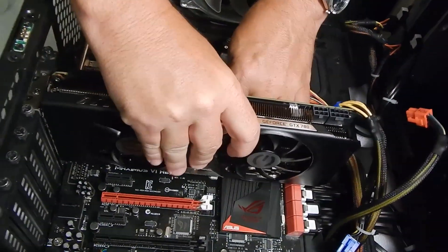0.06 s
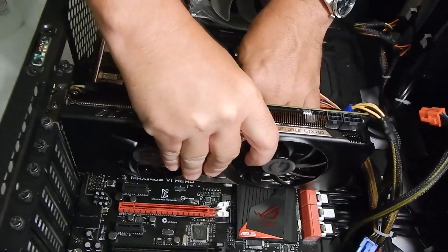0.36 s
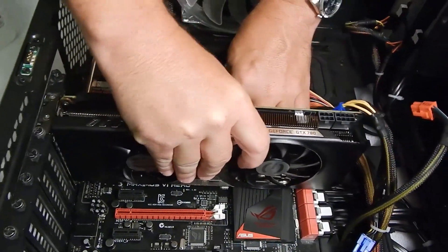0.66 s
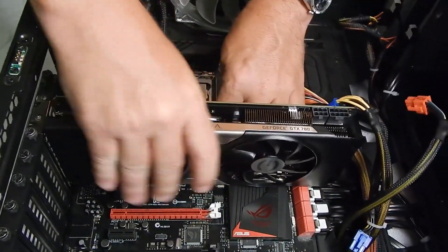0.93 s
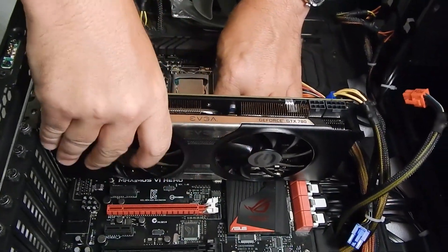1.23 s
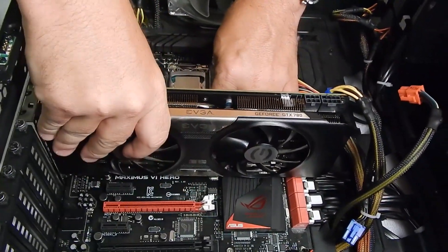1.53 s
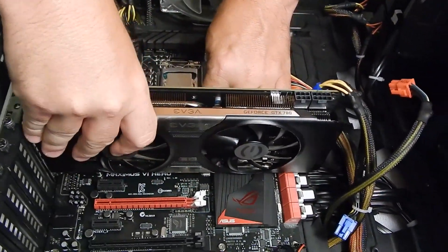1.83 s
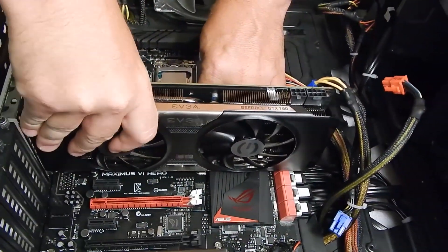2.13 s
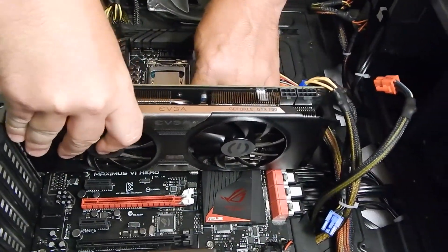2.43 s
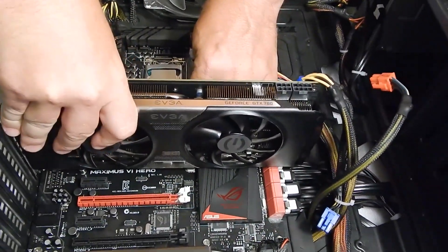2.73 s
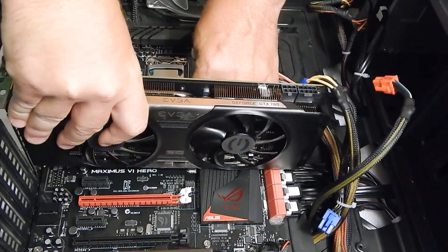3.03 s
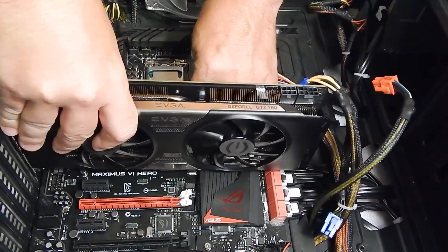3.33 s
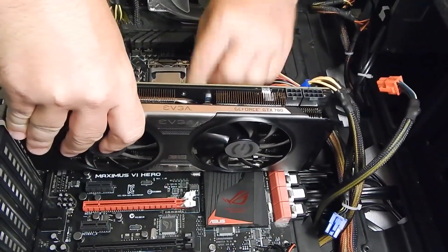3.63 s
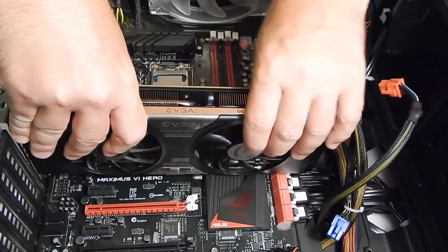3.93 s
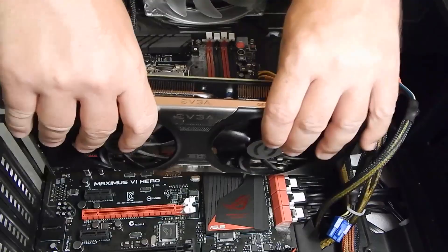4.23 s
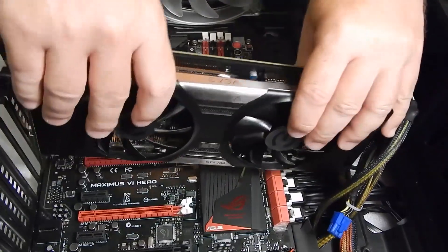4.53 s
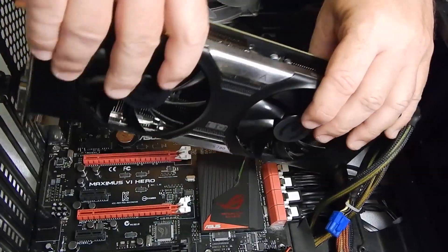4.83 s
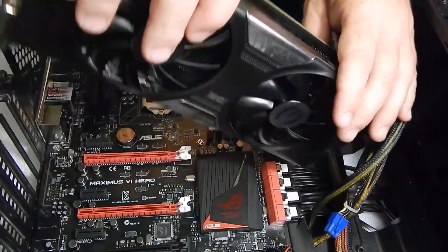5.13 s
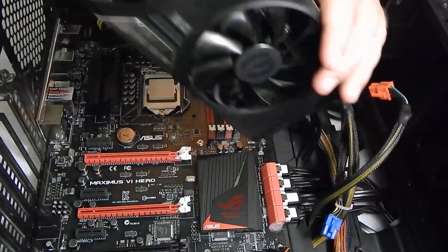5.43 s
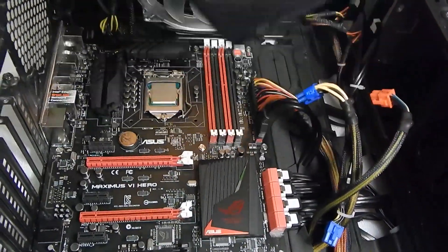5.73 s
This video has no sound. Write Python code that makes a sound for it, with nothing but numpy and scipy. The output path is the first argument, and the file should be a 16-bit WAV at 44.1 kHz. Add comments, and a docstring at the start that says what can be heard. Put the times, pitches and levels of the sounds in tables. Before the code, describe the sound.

Over steady room noise, faint plastic taps and rubbing surround a low thud and two loud latch snaps in a steel computer case.

```python
"""Inside an open steel computer case, close to a small stereo microphone, two hands work a graphics card loose.
Over steady room noise, fingers rub (stick-slip friction) and tap (impact) on the plastic shroud.
The board gives with a thud, and latch and slot let go with two sharp, rattling snaps that excite the
modes of the case. The recorder's gain control ducks the room noise after each snap."""
import sys
import numpy as np
from scipy import signal
from scipy.fft import rfft, irfft, next_fast_len
from scipy.io import wavfile
from scipy.ndimage import uniform_filter1d, minimum_filter1d

SR = 44100
rng = np.random.default_rng(int(sys.argv[2]) if len(sys.argv) > 2 else 0)


def to_wav(sig):
    """Store sig (one row per channel, or 1-D mono) as 16-bit WAV at the path in sys.argv[1].

    Samples outside -1..1 are clipped; the rate is SR.
    """
    pcm = np.clip(np.atleast_2d(sig), -1, 1) * 32767
    pcm = np.round(pcm).astype(np.int16)
    wavfile.write(sys.argv[1], SR, pcm.T)  # frames by channels


N = 258867

# noise spectra of room, sliding skin, taps, contact strip and snaps: f/Hz, relative density/dB
ROOM_SPECTRUM = [(15, -42.5), (25, -13), (96, -2.5), (169, -1), (215, -8), (253, -14), (378, -15),
                 (410, -14), (469, -15), (552, -19.5), (703, -20), (1110, -22.5), (2360, -27.5),
                 (7300, -43), (15500, -42)]
RUB_SPECTRUM = [(150, 0.5), (350, 8.5), (800, -3), (1500, -7), (3000, -13.5), (6000, -22), (11000, -19),
                (15500, -33)]
TAP_SPECTRUM = [(120, 15), (400, 7), (850, 11), (1300, -10.5), (2000, -9), (3000, -11.5), (4500, -15),
                (6500, -17), (10500, -13.5), (15500, -29.5)]
CRUNCH_SPECTRUM = [(150, -3), (350, -0.5), (500, -8), (720, -15.5), (1100, -17), (2000, -18), (3000, -23.5),
                   (7000, -37), (10500, -31), (13000, -34), (15500, -49.5)]
SNAP_SPECTRUM = [(150, -14.5), (400, -5), (750, -6.5), (1100, -4), (1400, 0.5), (1850, 5.5), (2300, 2),
                 (3100, 0), (4000, -4.5), (5000, -4), (6500, -9), (9000, -2.5), (12000, -2.5), (15500, -8)]
# left-right correlation of the room and of near sounds: f/Hz, correlation (-1..1)
ROOM_CORRELATION = [(60, 0.85), (150, 0.97), (300, 0.7), (640, 0.44), (1400, .2), (3500, 0), (15000, 0.084)]
NEAR_CORRELATION = [(150, 0.96), (400, 0.99), (1000, 0.79), (3000, 0.46), (8000, 0.087), (15000, 0.165)]
# reverberation in case and room: f/Hz, T60/s
TAP_DECAY = [(150, 0.087), (600, 0.24), (2000, 0.18), (6000, 0.24), (15000, 0.15)]
SNAP_DECAY = [(150, 0.25), (600, 0.31), (2000, 0.25), (4000, 0.24), (9000, 0.24), (15000, 0.17)]
# normal modes of plastic shroud, board, steel case, latch and slot: f/Hz, level/dB, T60/s
SHROUD_MODES = [(346, -13, 0.16), (400, -16, 0.11), (585, -6, 0.067), (724, -3.5, 0.035), (926, -17.5, 0.3),
                (1199, -12, 0.1), (1817, -18.5, 0.19), (3000, -51, 0.12), (3740, -34.5, 0.12)]
BOARD_MODES = [(50.1, -14.5, 0.49), (98.5, -13.5, 0.53), (139, 1, 0.18), (159, -2.5, 0.18),
               (197.6, -14.5, 0.18), (234.9, -15.5, 0.24), (313.4, -9.5, 0.23), (342, -9.5, 0.054),
               (372, -19.5, 0.24)]
CASE_MODES = [(378.4, -14, 0.2), (535.5, -23.5, 0.45), (696.5, -22.5, 0.2), (1100, -22.5, 0.28),
              (1554, -13.5, .25), (1580, -17.5, 0.19), (1785, -12, 0.12), (2010, -13, 0.13),
              (2203, -14, 0.27), (2290, -6, 0.14), (2260, -12, 0.23), (3083, -28, 0.1), (5200, -21, 0.15),
              (8800, -17, .2), (10900, -17, 0.15), (11850, -22, .18)]
LATCH_MODES = [(1126, -24, .25), (1176, -19.5, .12), (1397, -20.5, .1), (3070, -19.5, .16)]
SLOT_MODES = [(1144, -19, 0.048), (1410, -28, 0.1), (1930, -16, 0.089), (2076, -21, 0.1)]
# skin and cables sliding on the card: t/s, duration/s, level/dB
STROKES = [(0, 0.42, -58.5), (0.762, 0.7, -61), (2.103, 0.96, -58.5), (4.346, 0.071, -64),
           (4.98, 0.38, -65.5)]
# fingers on the shroud, dull with the pad, bright with the nail: t/s, contact/s, level/dB, brightness/dB
TAPS = [(.03, .035, -56.5, -2), (.07, 0.0018, -60.5, 7), (.135, 0.01, -62, 0.5),
        (.203, 0.0034, -66.5, -13.5), (.259, 0.069, -60.5, -6.5), (.514, .006, -62.5, 1.5),
        (.644, 0.0083, -44.5, -1), (.885, 0.006, -52, -7.5), (1.295, 0.01, -55.5, -7.5),
        (1.325, 0.0071, -57, -5), (1.604, 0.0097, -58.5, 2), (1.687, 0.033, -55.5, 0),
        (1.727, 0.012, -54.5, 0), (2.816, 0.0082, -53, -7.5), (2.894, 0.011, -61.5, -7.5),
        (3.071, 0.0013, -60.5, 3), (3.126, .004, -54, 7), (3.201, 0.012, -54, 4), (4.387, 0.019, -60, -12),
        (5.254, 0.0081, -55.5, -9.5)]
# short notes, the tapped shroud's low ring and two tiny high metal pings: t/s, f/Hz, level/dB
SHORT_NOTES = [(2.818, 880, -39), (2.894, 2880, -44), (2.917, 3340, -53), (3.075, 925, -43.5),
               (4.392, 890, -45), (5.252, 351, -34)]
# low bumps of the board around the thud and after each snap: t/s, level/dB
BUMPS = [(2.184, -38.5), (2.2745, -18), (2.488, -27), (2.586, -28.5), (4.085, -25.5)]
# the freed card grazing the case: t/s, contact/s, level/dB, brightness/dB
GRAZES = [(4.249, 0.0027, -55, -3), (4.282, 0.0052, -42, 4)]
# latch, then slot, letting go: t/s, level/dB, delay until the card rebounds/s
SNAPS = [(2.4495, -19.5, 0.094), (4.0147, -18, 0.074)]
# narrow dips in the microphone's response: f/Hz, Q
MICROPHONE_DIPS = [(2560, 28), (7520, 58)]

GIVE_S = 2.219   # the moment the card gives way


def from_db(db):
    """The amplitude ratio of a level in decibels."""
    return 10 ** (np.asarray(db) / 20)


def unit_rms(x):
    """Normalisation to rms 1."""
    return x / np.sqrt(np.mean(x ** 2) + 1e-20)


def at_hz(points, hz):
    """Interpolation of a table along a log-frequency axis."""
    table = np.array(points)
    return np.interp(np.log(hz), np.log(table[:, 0]), table[:, 1])


def butter(x, hz, kind, order=2):
    """A causal, maximally flat low-, high- or band-pass."""
    return signal.sosfilt(signal.butter(order, hz, kind, fs=SR, output="sos"), x)


def crossover(x, hz):
    """Phase-matched low and high bands, which sum without a dip."""
    return [butter(butter(x, hz, kind), hz, kind) for kind in ("low", "high")]


def add(track, start_s, sound):
    """Superposition of a sound on a track."""
    start = round(start_s * SR)
    track[..., start:start + sound.shape[-1]] += sound[..., :N - start]


def drift(knots_per_s):
    """Random modulation: straight lines between Gaussian values, rms 1."""
    knots = rng.standard_normal(int(N / SR * knots_per_s) + 2)
    return unit_rms(np.interp(np.arange(N) / SR * knots_per_s, np.arange(len(knots)), knots))


def stereo_noise(spectrum, correlation, size):
    """Partial coherence: independent mid and side noises mix to a given correlation; rms 1."""
    padded = next_fast_len(size, real=True)
    hz = np.maximum(np.fft.rfftfreq(padded, 1 / SR), 1)
    mid, side = np.exp(2j * np.pi * rng.random((2, len(hz))))
    alike = np.clip(at_hz(correlation, hz), -1, 1)
    both = np.sqrt(1 + alike) * mid + np.sqrt(1 - alike) * side * [[1], [-1]]
    return unit_rms(irfft(both * from_db(at_hz(spectrum, hz)), padded)[:, :size])


def ringing(modes, t):
    """Free vibration: a sum of exponentially damped normal modes."""
    return sum(from_db(db - 60 * t / t60) * np.sin(2 * np.pi * hz * t) for hz, db, t60 in modes)


def knock(hz, db, t60):
    """Heavy damping: the struck plastic itself swings only a few cycles."""
    return ringing([(hz, db, t60)], np.arange(SR // 2) / SR)


def impulse_response(spectrum, decay, modes, crack_db, crack_s, modes_db):
    """Response to an impact: a short crack, the object's modes and reverberation dying band by band."""
    t = np.arange(SR // 2) / SR
    noise = rfft(stereo_noise(spectrum, NEAR_CORRELATION, len(t)))
    hz = np.maximum(np.fft.rfftfreq(len(t), 1 / SR), 1)
    centres_hz, t60s = zip(*decay)
    crack = from_db(crack_db) * np.exp(-t / crack_s)
    out = from_db(modes_db) * ringing(modes, t)
    for share, t60 in zip(np.eye(len(decay)), t60s):
        band = irfft(noise * np.interp(np.log(hz), np.log(centres_hz), share), len(t))
        out = out + band * (from_db(-60 * t / t60) + crack)
    return out


def contact_force(length_s, slips_per_s, touch_s):
    """Impact, then friction: a first touch, harder in short contacts, and a swell of slips; energy 1."""
    t = np.arange(SR // 8) / SR
    slips = rng.standard_normal(len(t)) * (rng.random(len(t)) < slips_per_s / SR)
    force = slips * np.exp(-(t / length_s - .5) ** 2 * 2)
    force[0] = touch_s / length_s
    return force / np.sqrt(np.sum(force ** 2))


def contacts(events, response, slips_per_s, touch_s):
    """Convolution of force and response in three bands; brightness is the level step between bands."""
    body, upper = crossover(butter(response, 230, "high"), 1300)
    clack, click = crossover(upper, 5000)
    out = np.zeros((2, N))
    for start_s, length_s, level_db, bright_db in events:
        force = contact_force(length_s, slips_per_s, touch_s)[None]
        for tilt, band in zip((-1, 0, 1), (body, clack, click)):
            sound = signal.fftconvolve(band, force, axes=1)
            onset_rms = np.std(sound[:, :SR // 25])   # first 40 ms
            add(out, start_s, from_db(level_db + tilt * bright_db) * sound / onset_rms)
    return out


def room_noise(level_db):
    """Stationary background noise, coherent between the two sides mainly in the bass."""
    return from_db(level_db) * stereo_noise(ROOM_SPECTRUM, ROOM_CORRELATION, N)


def rubbing(grip_db, attack_s, release_s, uneven_db):
    """Stick-slip friction: skin hisses unevenly, each stroke swelling above the resting grip."""
    t = np.arange(N) / SR
    envelope = from_db(grip_db)
    for start_s, length_s, db in STROKES:
        swell = np.minimum(1 + (t - start_s) / attack_s, 1 - (t - start_s - length_s) / release_s)
        envelope = envelope + from_db(db) * np.clip(swell, 0, 1)
    return envelope * from_db(uneven_db * drift(45)) * stereo_noise(RUB_SPECTRUM, NEAR_CORRELATION, N)


def skin_catches(per_s, contact_s, below_db, bright_db):
    """Static friction: sliding skin catches at uneven intervals, as firmly as the stroke presses."""
    events = []
    for start_s, length_s, db in STROKES:
        for k, (jitter, weakness) in enumerate(rng.random((12, 2))):
            after_s = (k + jitter) / per_s
            if after_s < length_s:
                events.append((start_s + after_s, contact_s, db - below_db - 4 * weakness, bright_db))
    return events


def finger_taps():
    """Impact excitation: taps and faint catches of the skin ring the plastic shroud."""
    shroud = impulse_response(TAP_SPECTRUM, TAP_DECAY, SHROUD_MODES,
                              crack_db=5, crack_s=0.0028, modes_db=0)
    catches = skin_catches(per_s=11, contact_s=0.025, below_db=14, bright_db=-1)
    return contacts([*TAPS, *catches], shroud, slips_per_s=1300, touch_s=0.0086)


def short_rings(rise_s, note_t60):
    """Resonance: latch and slot ring with their snaps; the tapped shroud rings low, metal pings high."""
    t = np.arange(SR // 4) / SR
    onset = 1 - np.exp(-t / rise_s)
    out = np.zeros(N)
    for snap, modes in zip(SNAPS, (LATCH_MODES, SLOT_MODES)):
        add(out, snap[0], ringing(modes, t) * onset)
    for start_s, hz, db in SHORT_NOTES:
        add(out, start_s, ringing([(hz, db, note_t60)], t) * onset)
    return out


def board_thuds(push_s, recoil_db, boom_db, boom_t60):
    """Soft force pulses (bumps, judder, snap recoil) drive the board's low modes; the room booms on."""
    judder = [(GIVE_S + k * 0.0055, -9 - k * 10.5) for k in range(3)]   # quick slips: t/s, level/dB
    recoil = [(snap[0], recoil_db) for snap in SNAPS]
    pulse = np.hanning(round(push_s * SR))
    force = np.zeros(N)
    for start_s, db in [*BUMPS, *judder, *recoil]:
        add(force, start_s, from_db(db) * pulse / pulse.sum())
    t = np.arange(SR) / SR
    boom = unit_rms(butter(stereo_noise(ROOM_SPECTRUM, NEAR_CORRELATION, len(t)), [90, 533], "band"))
    boom_envelope = from_db(boom_db - 60 * t / boom_t60) * (1 - np.exp(-t / 0.0056))
    response = ringing(BOARD_MODES, t) + boom_envelope * boom
    thuds = signal.fftconvolve(force[None], response, axes=1)[:, :N]
    return butter(thuds, 64, "high")   # a small board radiates little deep bass


def contact_strip():
    """Static, then sliding friction: the contact strip cracks loose and grates in its slot."""
    crunch = impulse_response(CRUNCH_SPECTRUM, SNAP_DECAY, BOARD_MODES,
                              crack_db=6.5, crack_s=0.015, modes_db=-10.5)
    crunch += knock(hz=756, db=2.5, t60=0.019)
    # t/s, contact/s, level/dB, brightness/dB
    crack = (GIVE_S, 0.003, -33.5, -9.5)
    grate = (GIVE_S + 0.006, 0.031, -37.5, -4)
    return contacts([crack, grate], crunch, slips_per_s=1800, touch_s=0.01)


def snaps(skid_gap_s, skid_loss_db, rebound_gap_s, rebound_loss_db):
    """Inelastic collisions ring the case: per snap a blow, two skids, three rebounds; last, two grazes."""
    case = impulse_response(SNAP_SPECTRUM, SNAP_DECAY, CASE_MODES,
                            crack_db=7, crack_s=0.0069, modes_db=1.5)
    case += knock(hz=1097, db=2, t60=0.0098)
    events = []   # t/s, contact/s, level/dB, brightness/dB
    for start_s, db, flight_s in SNAPS:
        blow = (start_s, 0.0009, db, 5.5)
        skids = [(start_s + 0.017 + k * skid_gap_s, 0.023, db - 11 - k * skid_loss_db, 7.5)
                 for k in range(2)]
        rebounds = [(start_s + flight_s + k * rebound_gap_s, 0.013,
                     db - 12.5 - k * k * rebound_loss_db, 5.5) for k in range(3)]
        events += [blow, *skids, *rebounds]
    return contacts([*events, *GRAZES], case, slips_per_s=3100, touch_s=0.0016)


def from_left(x, lag_s, pan_db):
    """Time and level differences: the case's sound reaches the right capsule later and weaker."""
    size = next_fast_len(N + 64, real=True)
    delay = np.exp(-2j * np.pi * np.fft.rfftfreq(size, 1 / SR) * lag_s)
    right = irfft(rfft(x[1], size) * delay, size)[:N]
    return np.array([x[0] * from_db(pan_db), right * from_db(-pan_db)])


def scene():
    """Superposition of the near sounds in the case and the room's steady noise."""
    room = room_noise(level_db=-48)
    near = rubbing(grip_db=-68, attack_s=0.11, release_s=0.17, uneven_db=2.5)
    near += finger_taps()
    near += short_rings(rise_s=0.00093, note_t60=0.1)
    near += board_thuds(push_s=0.0025, recoil_db=-22, boom_db=-8.5, boom_t60=0.32)
    near += contact_strip()
    near += snaps(skid_gap_s=0.034, skid_loss_db=10.5, rebound_gap_s=0.026, rebound_loss_db=3.5)
    return room + from_left(near, lag_s=54e-6, pan_db=0.4)


def gain_control(x, threshold_db, hold_s, release_db_per_s, treble_ratio):
    """Compression: bright peaks cut the gain at once, the treble furthest; it holds, then creeps back."""
    power = uniform_filter1d(np.mean(butter(x, 1000, "high") ** 2, axis=0), SR // 200)
    over_db = np.maximum(10 * np.log10(np.abs(power) + 1e-12) - threshold_db, 0)
    half = round(hold_s * SR / 2)
    held_db = -minimum_filter1d(-over_db, 2 * half + 1, origin=half)   # maximum of the last hold_s
    ramp_db = release_db_per_s * np.arange(N) / SR
    cut_db = uniform_filter1d(np.maximum.accumulate(held_db + ramp_db) - ramp_db, SR // 1000)
    low = butter(x, 3000, "low", order=1)
    return low * from_db(-cut_db) + (x - low) * from_db(-cut_db * treble_ratio)


def record(dry):
    """The signal chain: microphone notches, gain control and a steep band limit."""
    for hz, q in MICROPHONE_DIPS:
        dry = signal.lfilter(*signal.iirnotch(hz, q, fs=SR), dry)
    out = gain_control(dry, threshold_db=-12.5, hold_s=0.32, release_db_per_s=18.5, treble_ratio=2.16)
    return signal.sosfilt(signal.ellip(10, .2, 80, 15800, fs=SR, output="sos"), out)


dry = scene()
out = record(dry)
to_wav(out)
```